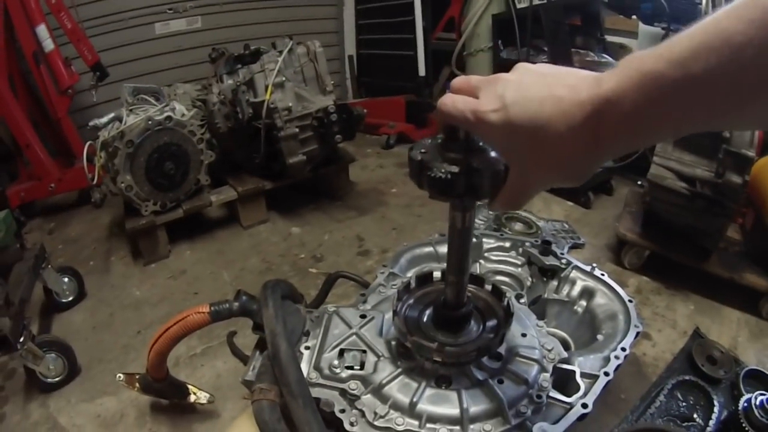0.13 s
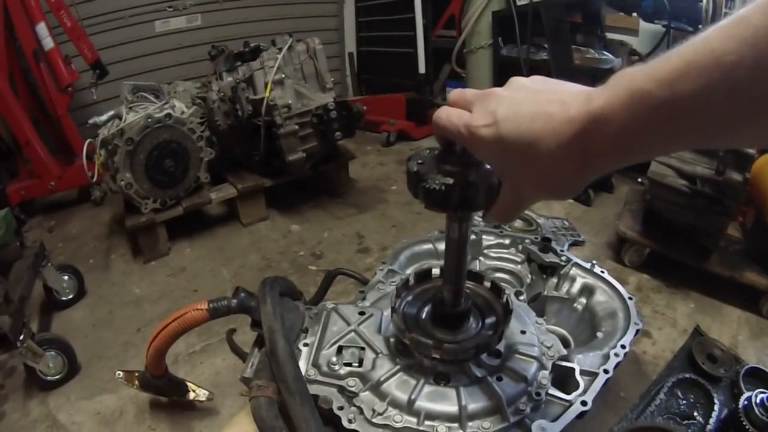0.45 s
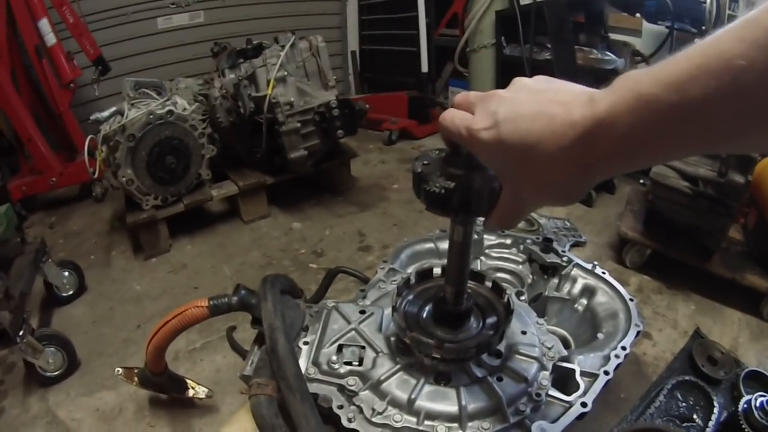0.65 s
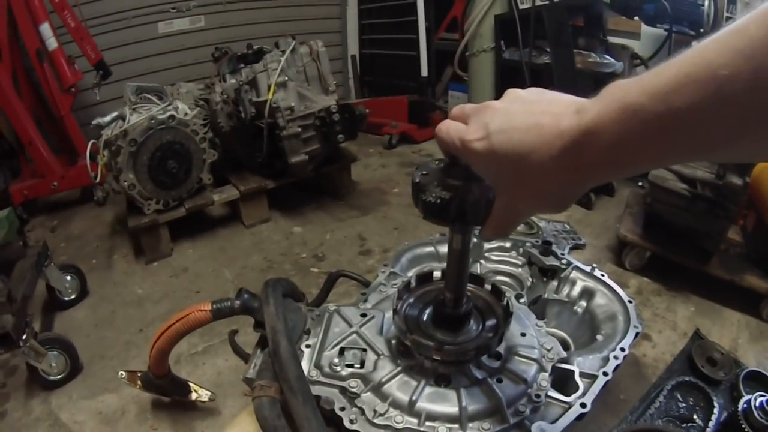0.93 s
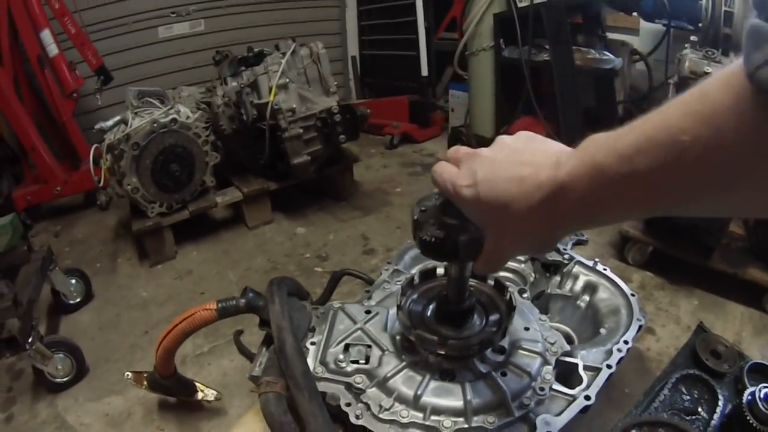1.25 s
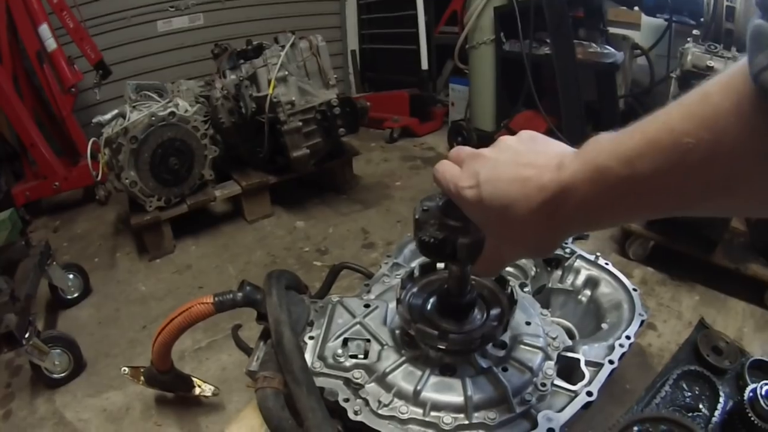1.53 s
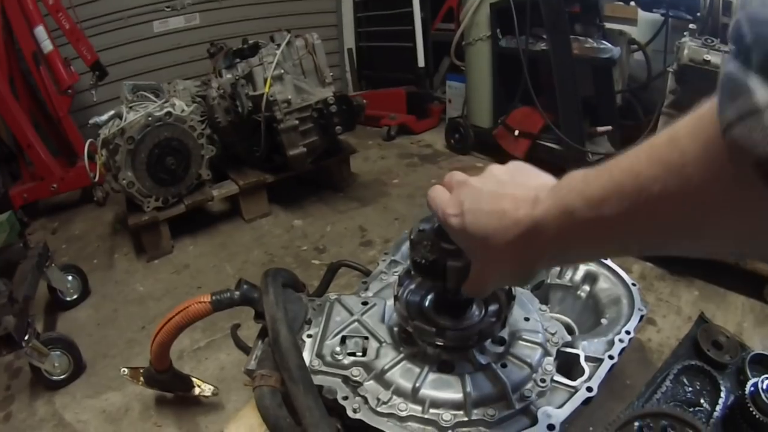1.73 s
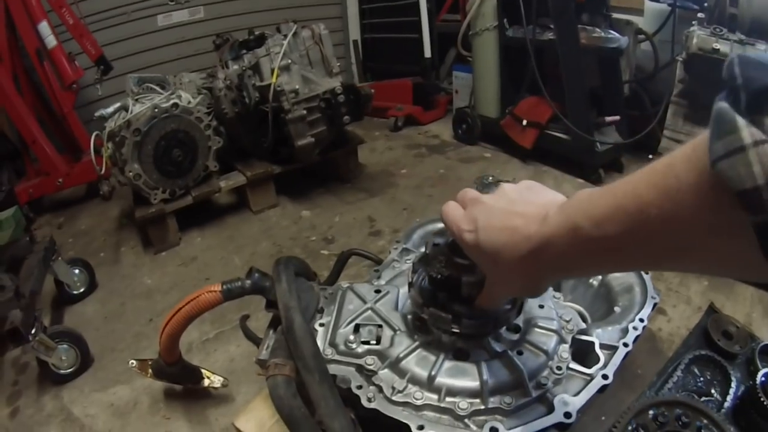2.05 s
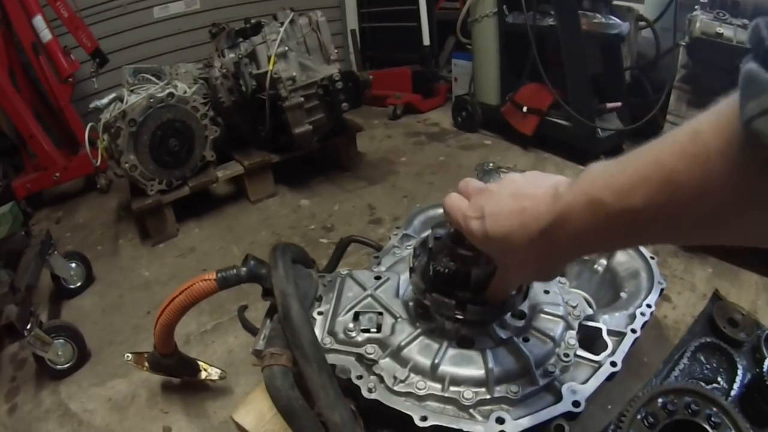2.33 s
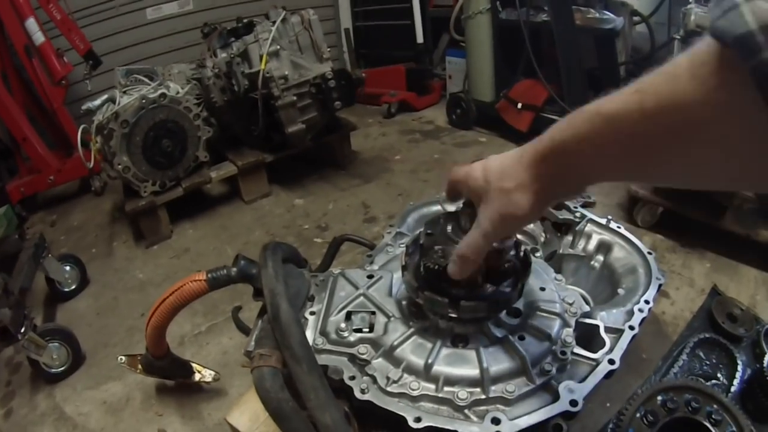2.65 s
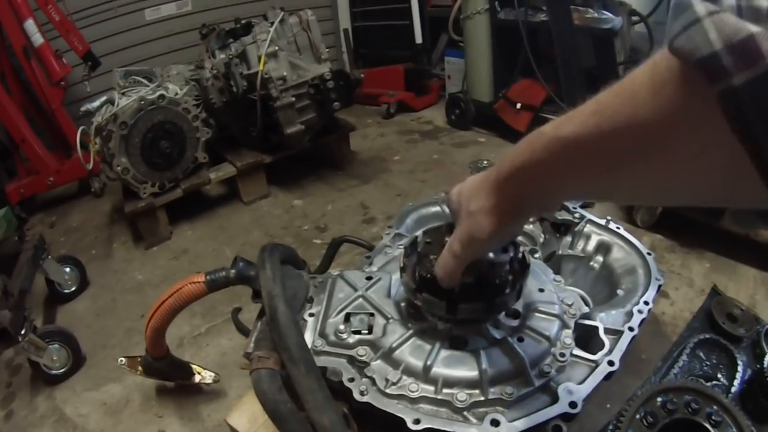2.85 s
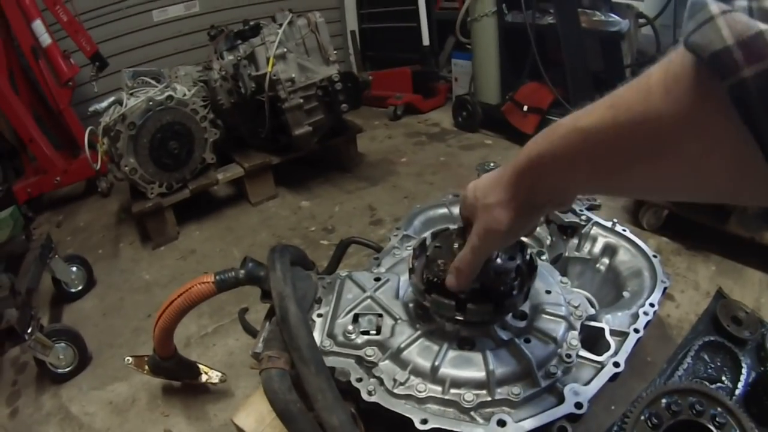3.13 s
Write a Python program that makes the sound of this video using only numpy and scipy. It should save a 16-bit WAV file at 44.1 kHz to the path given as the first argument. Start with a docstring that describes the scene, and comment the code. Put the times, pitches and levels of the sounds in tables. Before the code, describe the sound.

A heavy steel gear shaft clinks faintly, rubs and knocks deeper into an aluminium case, then seats with two hard metallic clanks. Close microphone, short cluttered garage echo, faint steady hiss.

```python
"""Gear shaft lowered into a gearbox case

A steel gear shaft is lowered by hand into an aluminium gearbox case on a garage floor.
It clinks (beating modes), rubs in its splines (filtered slips) and knocks down step by step
(decaying noise and case modes) until two hard blows seat it. The case rings briefly, and the
cluttered garage answers (convolution with decaying noise) over a faint hiss (shaped noise)."""
import sys
import numpy as np
from scipy import signal
from scipy.fft import rfft, irfft, next_fast_len
from scipy.io import wavfile

SR = 44100
rng = np.random.default_rng(int(sys.argv[2]) if len(sys.argv) > 2 else 0)


def waveform_to_disk(signal):
    """Save audio, clipped to [-1, 1], as 16-bit WAV at the path in sys.argv[1]."""
    frames = np.transpose(np.atleast_2d(signal))
    scaled = np.clip(frames, -1, 1) * 32767
    samples = np.round(scaled).astype(np.int16)
    wavfile.write(sys.argv[1], SR, samples)


N = 145530   # length in samples
RING = 32768   # longest response in samples
AGE = np.arange(RING) / SR   # time since a contact in s
RISE_CYCLES = 1   # time constant of a mode's build-up, in its own periods

# Crowd of damped modes of case and gears: f/Hz, level/dB, t60/s
DAMPED_MODES = [(69.7, -14, 0.35), (130, -9, 0.27), (238, 5, 0.13), (417, 0.5, 0.026), (790, 3, 0.17),
                (1040, 0, 0.02), (1480, 2.5, 0.028), (2240, 2, 0.028), (2770, -2.5, 0.01),
                (3230, -0.5, .03), (4520, -0.5, 0.01), (6400, 1.5, 0.0083), (9560, 0.5, 0.064),
                (13400, -9.5, 0.038)]


def from_db(db):
    """Level to amplitude: 20 dB is a factor of ten."""
    return 10 ** (np.asarray(db) / 20)


def at_hz(rows, hz):
    """Interpolate every column of a table along logarithmic frequency."""
    freqs, *columns = np.transpose(rows)
    log_hz = np.log(np.maximum(hz, 1))
    return [np.interp(log_hz, np.log(freqs), column) for column in columns]


def unit(x):
    """Normalise the energy, the sum of squares, to one."""
    return x / np.sqrt(np.sum(x ** 2) + 1e-20)


def add(out, s, sound):
    """Superpose a sound from time s onwards."""
    start = max(int(s * SR), 0)
    out[start:start + len(sound)] += sound[:max(N - start, 0)]


def dying(t60):
    """Exponential decay of a damped vibration, 60 dB in t60 seconds."""
    return from_db(-60 * AGE / max(t60, 1e-3))


def coloured(x, spectrum):
    """Minimum-phase filter: a folded cepstrum makes the (f/Hz, level/dB) spectrum causal."""
    size = 2 * next_fast_len(len(x))
    bins_hz = np.arange(size // 2 + 1) * SR / size
    cepstrum = irfft(np.log(from_db(at_hz(spectrum, bins_hz)[0])))
    cepstrum[1:size // 2] *= 2
    cepstrum[size // 2 + 1:] = 0
    response = np.exp(rfft(cepstrum))
    return irfft(rfft(x, size) * response)[:len(x)]


def noise_bands(size):
    """Third-octave analysis of noise: (centre Hz, amplitude share of white noise, band noise)."""
    edges = 60 * 2 ** (np.arange(25) / 3)
    lead_in = RING // 8   # the filters settle here
    white = rng.standard_normal((2, size + lead_in))
    for k, (low, high) in enumerate(zip(edges, edges[1:])):
        band_pass = signal.butter(2, [low, high], "band", fs=SR, output="sos")
        band = signal.sosfilt(band_pass, white[k % 2])   # neighbours use independent noise
        yield np.sqrt(low * high), np.sqrt(2 * (high - low) / SR), band[-size:]


def knocks():
    """Impact excitation: each contact gives a coloured clatter, case modes and a snap for the room."""
    # Contacts: t/s, five relative band levels/dB, favoured case mode f/Hz, free ringing level/dB
    contacts = [(0.1271, -59, -55, -58, -51.5, -77, 512, 1.5), (0.201, -72, -57, -73, -73, -78, 512, 0),
                (0.32, -62, -58, -73, -65, -63, 525, 3.5), (0.373, -57, -54.5, -57, -68, -77, 512, 2.5),
                (0.394, -61.5, -53, -69, -45, -54, 512, 2), (0.439, -60, -58.5, -67, -65, -67, 222, -3.5),
                (0.652, -53, -45, -53.5, -80, -81, 545, 2), (0.685, -75, -64, -80, -82, -87, 545, 1),
                (0.774, -57.5, -60.5, -79, -78, -90, 222, -6),
                (0.972, -45.5, -60.5, -74, -80, -81, 301, -11), (1.265, -49.5, -64, -61, -49, -57, 301, -9),
                (1.2752, -32, -28.5, -32, -35, -53.5, 301, -2), (1.631, -57, -52, -66, -51, -81, 668, -4),
                (1.644, -49.5, -48.5, -45, -56.5, -77, 775, -1.5),
                (1.809, -42, -39, -49, -58, -69, 222, 2.5), (1.822, -46, -49, -40.5, -52, -63, 222, -1),
                (1.8449, -63, -42, -63, -41.5, -56, 507, 0), (2.03, -46, -41.5, -42.5, -56.5, -60, 222, 0),
                (2.069, -53.5, -44, -58, -62, -66, 512, 8), (2.2225, -32.5, -27, -28, -34, -44, 795, -3.5),
                (2.585, -62, -71, -60.5, -55.5, -76, 775, -1),
                (2.816, -31, -27.5, -31.5, -26, -37.5, 530, 0),
                (2.972, -29, -30, -26, -24.5, -31.5, 301, -2.5),
                (2.975, -28, -23, -20, -21.5, -47, 775, -2)]
    # Bands of those levels: lower f/Hz, upper f/Hz
    bands_hz = [(150, 450), (450, 1100), (1100, 2000), (2000, 4500), (4500, 12000)]
    # Clear case modes: f/Hz, relative level/dB, t60/s
    case_modes = [(112.2, -9, 0.56), (136.5, -12.5, 0.56), (222.8, 3.5, 0.35), (303.7, 2, 0.34),
                  (385.6, -12.5, 0.31), (416.6, -6, 0.22), (503, -5, 0.41), (540.4, 0, 0.3),
                  (662.4, -13.5, 0.1), (779, 3, 0.23), (807.7, 5, 0.2), (1312.6, 1.5, 0.17),
                  (1460, -3.5, 0.3), (1690, -2, 0.27), (1843, -11, 0.43), (2163, -6, 0.21)]
    knock_db = -3.5
    case_db, case_spread_db = -43.5, 2
    favour_db, favour_octaves = 7.5, 0.11   # boost of the favoured mode and its reach
    snap_delay_s = 0.003   # a blow spreads through the case before it fills the room
    # the step between the last two bands carries on above them, by this share
    top_hz, top_rolloff = 12900, 0.77

    clatter, rings, snaps = np.zeros((3, N))
    low, high = np.transpose(bands_hz)
    centre_hz = np.sqrt(low * high)
    per_hz_db = 10 * np.log10(SR * SR / 100 / (high - low))   # a wide band spreads its energy thinner
    mode_hz, mode_db, _ = np.transpose(case_modes)
    modes = []
    for hz, _, t60 in case_modes:
        build_up = 1 - np.exp(-AGE * hz / RISE_CYCLES)
        modes.append(np.sin(2 * np.pi * hz * AGE) * dying(t60) * build_up / 2)
    modes = np.array(modes)
    snap = coloured(signal.unit_impulse(RING // 4), DAMPED_MODES)

    bursts = clatter_bursts(len(contacts))
    for (s, *levels, favoured_hz, free_db), burst in zip(contacts, bursts):
        colour = np.c_[centre_hz, knock_db + per_hz_db + levels]
        last_step_db = colour[-1, 1] - colour[-2, 1]
        colour = np.r_[colour, [[top_hz, colour[-1, 1] + top_rolloff * last_step_db]]]
        add(clatter, s, coloured(burst, colour))
        add(snaps, s + snap_delay_s, coloured(snap, colour))

        distance = np.log2(mode_hz / favoured_hz) / favour_octaves
        db = case_db + mode_db + at_hz(colour, mode_hz)[0] + free_db
        db = db + favour_db * np.exp(-distance ** 2)
        db = db + case_spread_db * rng.standard_normal(len(case_modes))
        signs = rng.choice([-1, 1], len(case_modes))
        add(rings, s, (from_db(db) * signs) @ modes)
    return clatter, rings, snaps


def clatter_bursts(count):
    """High modal density: many damped modes act as decaying noise, the low ones swelling later."""
    size = RING // 4
    out = np.zeros((count, size))
    for hz, share, noise in noise_bands(count * size):
        db, t60 = at_hz(DAMPED_MODES, hz)
        build_up = 1 - np.exp(-AGE * hz / RISE_CYCLES)
        shape = (dying(t60) * build_up)[:size]
        parts = noise.reshape(count, size)
        out += from_db(db) * share * np.array([unit(part * shape) for part in parts])
    return out


def clinks():
    """Modal beating: a hand-damped burst in each steel mode, then a thin ring with a close twin."""
    # Clinks: t/s, levels of the four modes/dB, free ringing level as the grip allows/dB
    contacts = [(0.1277, -49, -32, -65, -75, -0.5), (0.203, -66, -51, -80, -75, 10.5),
                (0.317, -73, -48, -44.5, -44, -19), (0.373, -56, -67, -55, -72, -1),
                (0.394, -70, -34.5, -46.5, -38, 2), (1.267, -47, -23, -31.5, -36, -9.5),
                (1.275, -57, -31, -22.5, -55, -20), (1.783, -64, -47, -59, -70, -6),
                (1.811, -65, -25.5, -56, -65, -15), (1.8458, -60, -20.5, -25, -28, -18.5),
                (2.028, -47, -36.5, -54, -48, -5), (2.223, -47, -25, -29.5, -29, -16),
                (2.816, -42, -1.5, -39, -28, -26), (2.829, -55, -8, -47, -27, -24),
                (2.972, -28, -30, -9, -17.5, -29)]
    # Shaft modes: f/Hz, free ring level against the first burst/dB, t60/s
    shaft_modes = [(1055.5, 8.5, 0.35), (2248, -5.5, 0.2), (3588, 2, 0.14), (6050, -22, 0.23)]
    burst_t60_s, burst_rise_s = 0.012, 0.0012
    split_hz, twin_db = 27, -16   # spacing and relative level of the twin

    bursts, rings = np.zeros(N), np.zeros(N)
    swell = 1 - np.exp(-(AGE / burst_rise_s) ** 2)
    for k, (hz, ring_db, t60) in enumerate(shaft_modes):
        tone = swell * np.sin(2 * np.pi * hz * AGE)
        twin = swell * from_db(twin_db) * np.sin(2 * np.pi * (hz + split_hz) * AGE)
        burst = tone * dying(burst_t60_s)
        ring = (tone + twin) * dying(t60) / 2
        for s, *levels, free_db in contacts:
            add(bursts, s, from_db(levels[k]) * burst)
            add(rings, s, from_db(levels[k] + ring_db + free_db) * ring)
    return bursts, rings


def rubs():
    """Sliding friction: a swell of tiny random slips excites one resonance, filtered twice."""
    # Rubs in the splines: t/s, length/s, level/dB, centre f/Hz, width/Hz
    strokes = [(1.065, 0.043, -68, 4340, 6000), (1.17, 0.093, -64, 4170, 6240),
               (1.605, 0.066, -56.5, 650, 490), (1.775, 0.083, -56, 1940, 1190),
               (1.86, .065, -51.5, 529, 65.4), (1.951, 0.085, -62.5, 586, 710),
               (2.046, 0.094, -49, 780, 159.4), (2.039, 0.082, -42.5, 534, 68.7),
               (2.12, 0.036, -51.5, 525, 50), (2.18, 0.13, -54.5, 705, 400), (2.795, 0.034, -57, 680, 900)]
    slips_per_s = 2500

    out = np.zeros(N)
    for s, length, db, hz, width_hz in strokes:
        stroke = np.sin(np.pi * np.minimum(AGE / length, 1))
        happens = rng.random(RING) < slips_per_s / SR
        slips = happens * rng.standard_normal(RING) * stroke
        b, a = signal.iirpeak(hz, hz / width_hz, fs=SR)
        rub = signal.lfilter(b, a, signal.lfilter(b, a, slips + 1e-18))
        add(out, s, from_db(db) * np.sqrt(length * SR) * unit(rub))
    return out


def tick():
    """Band-limited impulse: one small dry, dull click as the shaft shifts."""
    tick_s, impulse_db = 1.0197, -17
    click = from_db(impulse_db) * signal.unit_impulse(N, int(tick_s * SR))
    band_pass = signal.butter(2, [200, 1440], "band", fs=SR, output="sos")   # Hz
    return signal.sosfilt(band_pass, click + 1e-18)


def garage(x):
    """Reverberation by convolution: dense early echoes off floor and clutter, then a short tail."""
    # Room: f/Hz, reverberation level/dB, t60/s, side against mid level/dB
    room = [(99, -5, 0.98, -7), (250, -10.5, 0.74, -15), (563, -3, 0.48, -12), (1290, -5.5, 0.42, -8.5),
            (2600, -4.5, 0.4, -1), (5600, -5.5, 0.3, 3.5), (11900, -5.5, 0.3, -0.5)]
    first_echo_s = 0.0028   # middle of the onset
    early_db, early_t60_s = 7, 0.027

    response = np.zeros((2, RING))
    onset = np.clip(AGE / first_echo_s - 0.5, 0, 1)
    early = from_db(early_db) * dying(early_t60_s)
    for hz, share, noise in noise_bands(2 * RING):
        db, t60, side_db = at_hz(room, hz)
        shape = onset * (dying(t60) + early)
        mid = unit(noise[:RING] * shape)
        side = from_db(side_db) * unit(noise[RING:] * shape)
        response += from_db(db) * share * np.array([mid + side, mid - side])
    return signal.fftconvolve(x[None], response, axes=1)[:, :N]


def hiss():
    """Stationary random noise: steady room tone and hiss, shaped in spectrum and stereo width."""
    # Spectrum: f/Hz, relative level/dB
    spectrum = [(15, -24), (25, -2), (119, 5), (209, -1.5), (598, -2), (762, -7), (848, -4.5), (997, -6),
                (1450, -5.5), (1750, -8), (1950, -8.5), (5010, -14.5), (15500, -19)]
    # Stereo width: f/Hz, side against mid level/dB
    width = [(30, 3), (60, -17), (120, -4.5), (500, -5), (2000, -1.5), (10000, -1)]
    mid_db = -61.5

    white = rng.standard_normal((2, N))
    mid, side = (unit(coloured(channel, spectrum)) * np.sqrt(N) for channel in white)
    side = coloured(side, width)
    return from_db(mid_db) * np.array([mid + side, mid - side])


def scene():
    """Superposition of direct and reverberant sound: the parts straight ahead, the garage around."""
    small_room_db, ring_room_db = -4, -9.5   # shares of short and long sounds sent to the reverberation
    clatter, case_ring, snaps = knocks()
    bursts, shaft_ring = clinks()
    long_sounds = case_ring + shaft_ring + rubs()
    small = bursts + tick()
    direct = clatter + small + long_sounds
    to_room = snaps + from_db(small_room_db) * small + from_db(ring_room_db) * long_sounds
    return direct + garage(to_room) + hiss()


def record(dry):
    """Elliptic low-pass: the top is cut steeply above 15.5 kHz."""
    low_pass = signal.ellip(10, 0.1, 70, 15500, fs=SR, output="sos")
    return signal.sosfilt(low_pass, dry)


dry = scene()
out = record(dry)
waveform_to_disk(out)
```